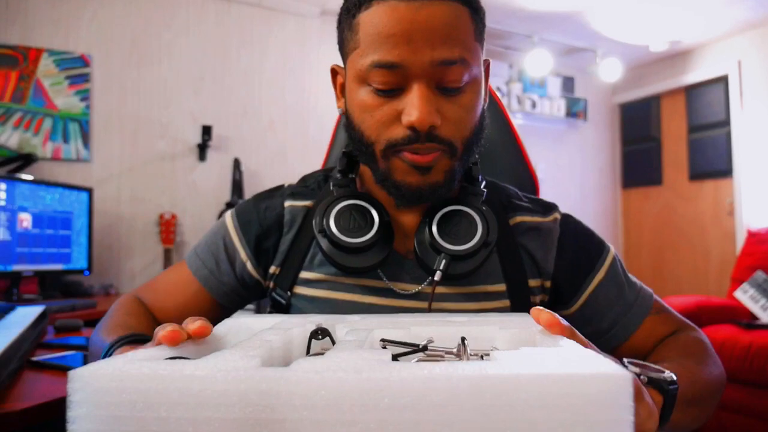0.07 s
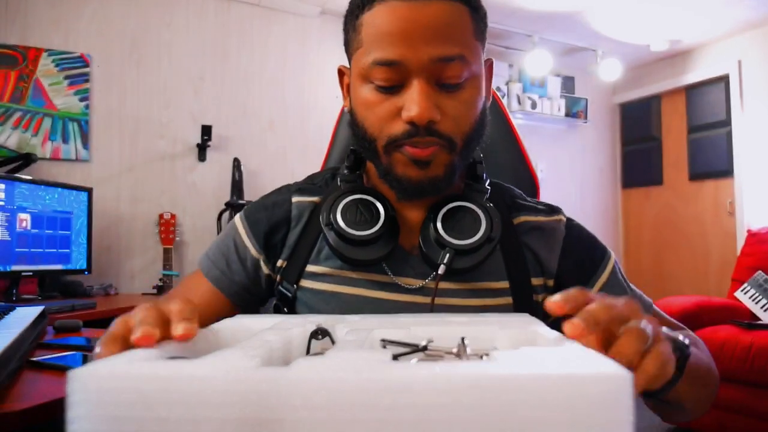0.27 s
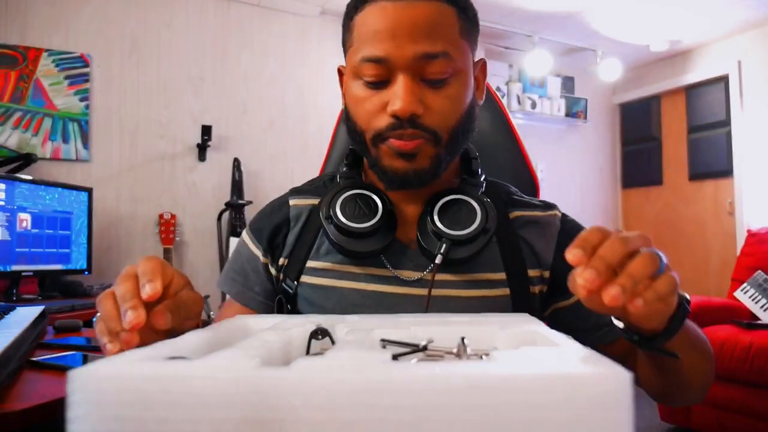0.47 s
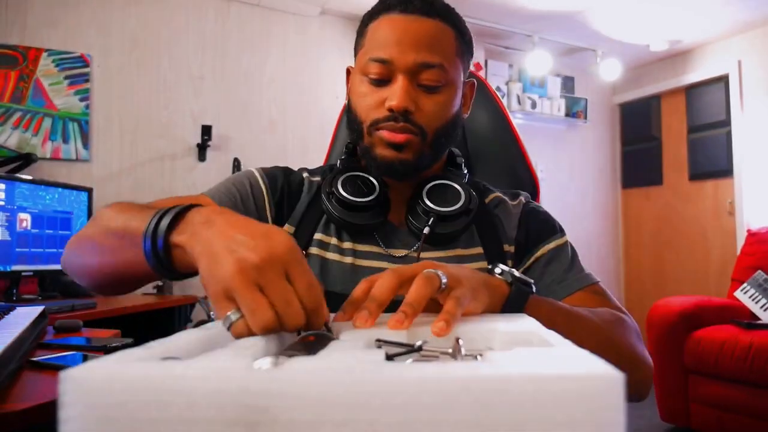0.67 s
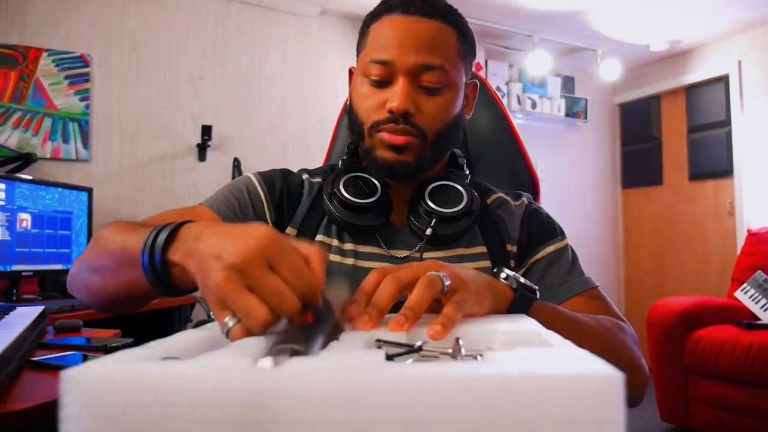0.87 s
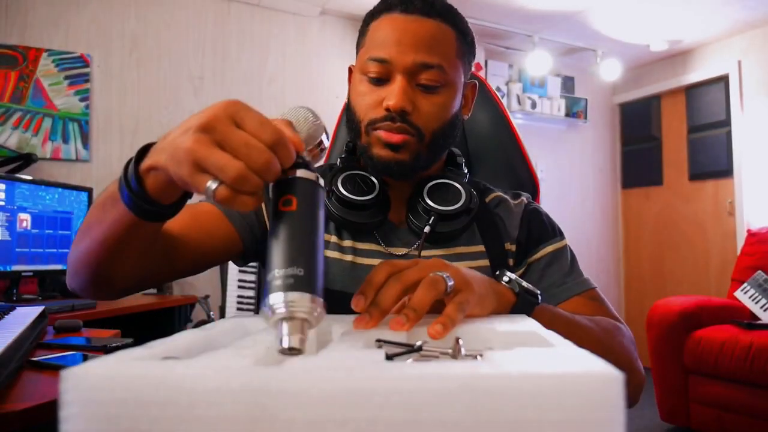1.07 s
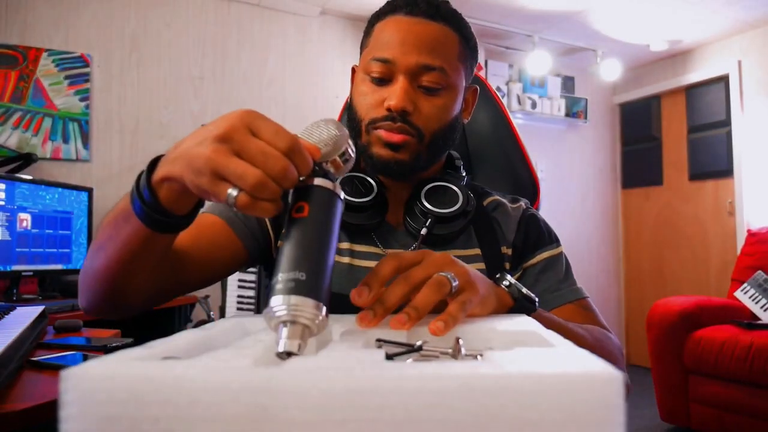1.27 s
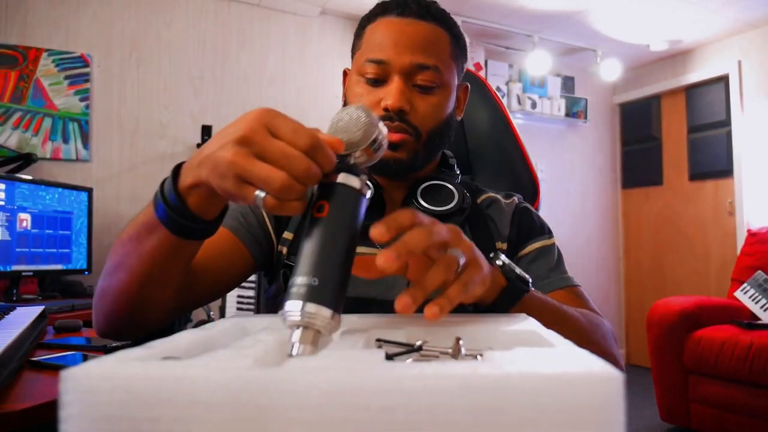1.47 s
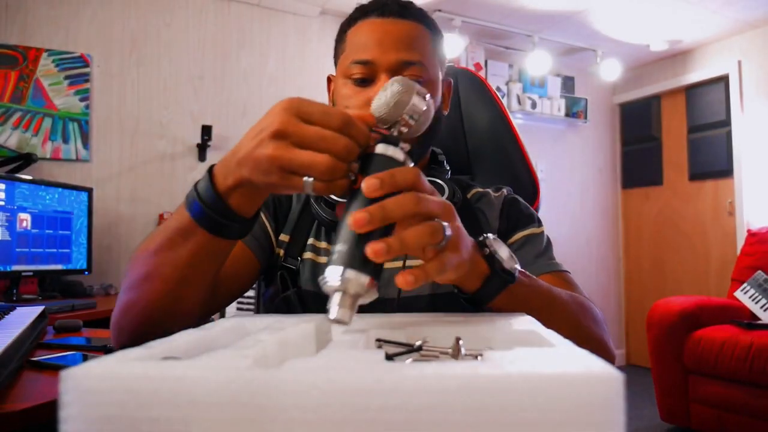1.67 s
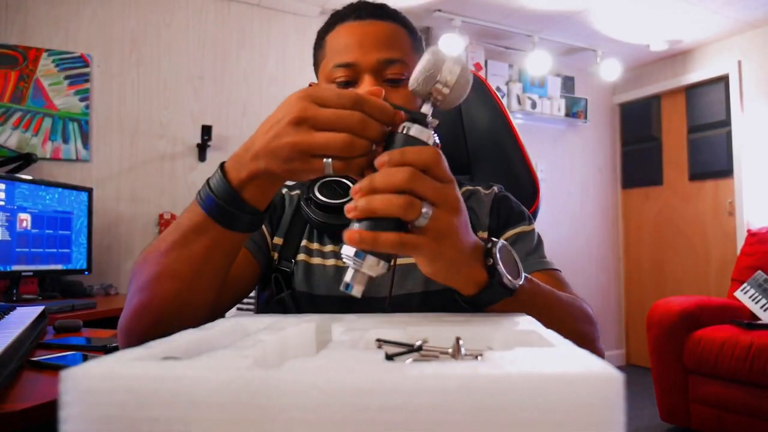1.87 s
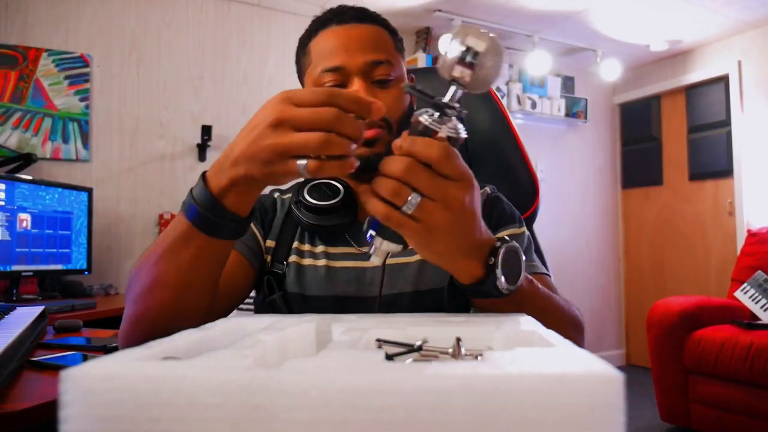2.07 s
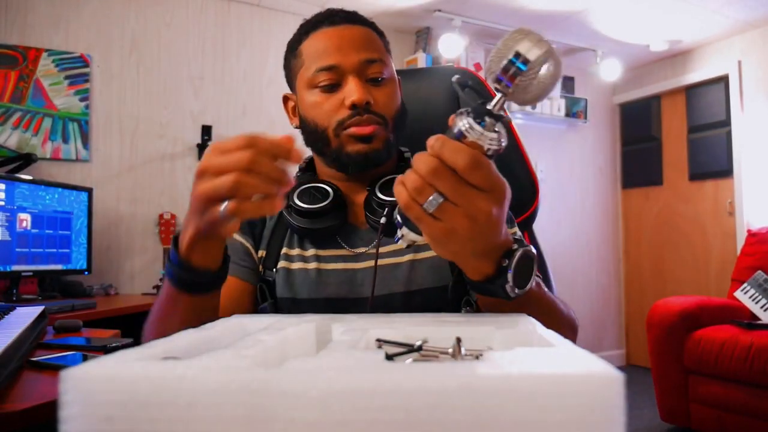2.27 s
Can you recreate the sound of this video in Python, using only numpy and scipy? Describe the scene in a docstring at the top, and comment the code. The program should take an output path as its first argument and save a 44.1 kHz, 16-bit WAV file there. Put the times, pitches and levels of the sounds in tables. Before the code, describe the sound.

Packing foam rasps as a metal object is pulled out. A bump with small clinks comes first, then a swelling rub ending in a squeak, then faint handling ticks. Heard close up in a small room.

```python
"""A desk in a small furnished room, one microphone close by, the image almost mono.
A hand-sized metal object is pulled out of a foam packing insert. Foam cells catch and let go in a
rasp, the hollow rises in pitch as it empties, and the object squeaks free. Loose metal parts clink,
the desk wobbles after a bump, and the object creaks and ticks as it changes hands."""
import sys
import numpy as np
from scipy import signal
from scipy.fft import rfft, irfft
from scipy.io import wavfile

SR = 44100
rng = np.random.default_rng(int(sys.argv[2]) if len(sys.argv) > 2 else 0)


def int16_out(signal):
    """Quantize to a 16-bit WAV file."""
    q = np.round(np.clip(np.atleast_2d(signal).T, -1, 1) * 32767)
    wavfile.write(sys.argv[1], SR, q.astype(np.int16))


N = 101562

# Background of the room: (frequency [Hz], relative density [dB])
ROOM_SPECTRUM = [(30, -8), (90, -15.5), (280, -20), (450, -29.5), (800, -26), (1300, -34.5), (2600, -38.5),
                 (8000, -40), (15500, -42.5)]
# Slow modes of the bumped desk: (frequency [Hz], level [dB], t60 [s])
DESK_MODES = [(18.3, -17, 1), (22.8, -29.5, 0.61)]
# Handling shakes the desk: (time [s], wobble level [dB], rumble level [dB])
DESK_SHAKE = [(0.05, -27, -20), (0.09, -21, -52), (0.2, -28, -52.5), (0.68, -54, -66), (0.93, -47, -39),
              (0.96, -34.5, -65), (1.02, -35.5, -63.5), (2.3, -73, -62)]
# Soft knocks: (time [s], strength [dB], frequency [Hz])
SOFT_KNOCKS = [(.027, -7, 458), (.034, -10.5, 127), (0.0354, -9.5, 232), (.909, -8.5, 530),
               (1.155, -19, 416), (1.16, -23, 710), (1.528, -32, 552), (1.977, -35.5, 320),
               (1.985, -31.5, 520), (2.084, -28.5, 1920), (2.12, -33.5, 890)]
# Modes of the gripped body: (frequency [Hz], relative level [dB], t60 [s])
GRIP_MODES = [(324, -2, 0.0136), (485, 5, 0.017), (708, 2, 0.02), (1047, -2, 0.02), (1590, -13.5, 0.022),
              (2250, -11, 0.023)]
# A ring ticks on the object: (time [s], strength [dB])
RING_TICKS = [(1.917, -23.5), (1.931, -40)]
# Modes of the object's shell: (frequency [Hz], relative level [dB], t60 [s])
SHELL_MODES = [(1160, -5.5, 0.012), (1960, -1.5, 0.019), (2190, -2.5, 0.011), (2910, 2, 0.008),
               (3310, 2, 0.0093), (5060, 2.5, 0.0053), (5490, 1.5, .018), (6900, -11, 0.0087)]
# Foam and finger snaps: (time [s], strength [dB])
FOAM_SNAPS = [(0.4806, -51), (1.4026, -38), (1.4204, -28.5), (1.4318, -38)]
# Loose metal parts meet: (time [s], strength [dB])
PART_HITS = [(0.0556, -35.5), (0.0713, -30), (.0745, -28), (0.1106, -37)]
# Modes of the loose parts: (frequency [Hz], relative level [dB], t60 [s])
PART_MODES = [(2218, 5.5, 0.036), (2490, -10, 0.16), (3030, -6, 0.039), (4590, -5, 0.034),
              (9620, -4.5, 0.04), (13060, -11, 0.11)]
# Squeaks, a palm slide and foam groans:
# (start [s], length [s], frequency [Hz], nominal width [Hz], level [dB])
FRICTION_BANDS = [(.966, 0.021, 7300, 500, -26.5), (.978, 0.034, 8280, 270, -26.5),
                  (1.002, 0.022, 7330, 360, -32), (.942, 0.045, 4300, 1100, -33),
                  (1.22, .045, 2080, 120, -50), (1.81, 0.063, 8100, 2300, -50.5),
                  (1.25, 0.035, 390, 50, -49), (1.395, 0.047, 560, 50, -48.5)]
# Resonance of the emptying hollow: (time [s], frequency [Hz])
HOLLOW_PITCH = [(.74, 562.8), (.82, 509.6), (.92, 569.6), (.96, 720.3), (.985, 880.6), (1.0, 1075),
                (1.03, 894)]
# Colour of the rasp: (frequency [Hz], relative density [dB])
RASP_SPECTRUM = [(150, -10), (300, -8), (560, -5), (900, -11.5), (1500, -11.5), (2800, -15), (4000, -17),
                 (6000, -20), (8200, -17), (10500, -26), (13200, -22), (15500, -24.5)]
# Rubbing on foam and skin, a list per stroke: (time [s], low [dB], middle [dB], high [dB])
RUB_STROKES = [
    [(0.0, -22.5, -34.5, -29), (0.032, -25, -28, -34), (0.05, -30, -38.5, -41.5), (0.082, -41.5, -40, -43),
     (0.132, -39.5, -48.5, -49.5), (0.34, -47.5, -53, -51.5), (0.385, -72, -77, -67)],
    [(0.74, -47.5, -54.5, -54), (0.794, -44.5, -56.5, -55), (0.826, -32.5, -45, -51.5),
     (0.872, -27.5, -32.5, -40), (0.916, -19.5, -23.5, -28), (0.934, -24, -29, -30.5),
     (0.982, -18, -27, -33.5), (1.014, -23.5, -31, -34.5), (1.036, -34.5, -38, -38.5),
     (1.068, -46, -49, -53), (1.145, -52.5, -50.5, -55.5), (1.158, -36.5, -46.5, -46),
     (1.206, -51, -47.5, -48), (1.24, -48, -43.5, -46.5), (1.274, -47, -47.5, -46), (1.29, -65, -58, -58.5),
     (1.338, -57, -59.5, -63), (1.426, -49, -44, -46.5), (1.5, -62, -69.5, -64.5)],
    [(1.655, -73, -65, -64), (1.678, -46, -51.5, -50.5), (1.76, -69, -68.5, -55), (1.862, -92, -68, -53),
     (1.982, -47.5, -50, -51.5), (2.07, -87, -72, -68.5), (2.19, -68, -63.5, -62), (2.234, -67.5, -81, -85),
     (2.3, -72, -86, -94)],
]


def amp(db):
    return 10 ** (np.asarray(db) / 20)


def unit_rms(x):
    return x / np.sqrt(np.mean(x ** 2) + 1e-20)


def curves(rows, outside=-120.):
    """Each column as straight lines between its times."""
    times, *columns = np.transpose(rows)
    return np.array([np.interp(np.arange(N) / SR, times, c, outside, outside) for c in columns])


def drift(corner_hz):
    """Slow random wander of spread 1."""
    step, settle = 40, 2000
    pole = np.exp(-2 * np.pi * corner_hz * step / SR)
    noise = rng.standard_normal(N // step + settle + 2)
    slow = signal.lfilter([1], [1, -2 * pole, pole ** 2], noise)[settle:]
    return np.interp(np.arange(N) / step, np.arange(len(slow)), unit_rms(slow))


def passband(x, hz, kind):
    return signal.sosfilt(signal.butter(2, hz, kind, fs=SR, output="sos"), x)


def coloured(x, spectrum, low_hz, high_hz):
    """Colour from a table between soft band edges, at rms 1."""
    hz = np.maximum(np.fft.rfftfreq(N, 1 / SR), 1)
    table_hz, db = np.transpose(spectrum)
    colour = amp(np.interp(np.log(hz), np.log(table_hz), db))
    skirts = 1 / np.sqrt((1 + (low_hz / hz) ** 6) * (1 + (hz / high_hz) ** 6))
    return unit_rms(irfft(rfft(x) * colour * skirts, N))


def resonate(force, hz, t60):
    """One mode: a unit click starts a decaying sine of height 1."""
    pole, angle = amp(-60 / (t60 * SR)), 2 * np.pi * hz / SR
    return signal.lfilter([0, np.sin(angle)], [1, -2 * pole * np.cos(angle), pole ** 2], force + 1e-18)


def clicks_at(times, gains):
    clicks = np.zeros(N)
    clicks[(np.asarray(times) * SR).astype(int)] = gains
    return clicks


def strike(events, modes, vary_db):
    """Every contact rings every mode with a strength of its own."""
    times, db = np.transpose(events)
    vary = vary_db * rng.standard_normal((len(times), len(modes)))
    return sum(resonate(clicks_at(times, (-1) ** k * amp(db + mode_db + vary[:, k])), hz, t60)
               for k, (hz, mode_db, t60) in enumerate(modes))


def grains(per_s, spread_db=2.5):
    """Random clicks of uneven size."""
    size = amp(spread_db * np.minimum(rng.exponential(1, N), 4)) * rng.choice([-1, 1], N)
    return size * (rng.random(N) < per_s / SR)


def room_tone():
    """A faint steady hush, strongest in the bass."""
    return amp(-57) * coloured(rng.standard_normal(N), ROOM_SPECTRUM, low_hz=31, high_hz=39000)


def room_tail(x, t60=.3):
    """Diffuse reflections, dull at the top and weak this close to the source."""
    t = np.arange(int(.5 * SR)) / SR
    dull_noise = signal.lfilter([.5], [1, -.5], rng.standard_normal(len(t)))
    tail = dull_noise * amp(-60 * t / t60) * (t > .006)
    return amp(-20) * signal.fftconvolve(x, tail / np.sqrt(np.sum(tail ** 2)))[:N]


def desk_wobble(bump_s=.0552):
    """The desk swings freely after the bump; handling keeps it swaying and rumbling."""
    free = sum(resonate(clicks_at([bump_s], amp(db)), hz, t60) for hz, db, t60 in DESK_MODES)
    sway_level, rumble_level = amp(curves(DESK_SHAKE))
    fade_in = np.clip((np.arange(N) / SR - .4) / .15, 0, 1)
    sway = unit_rms(resonate(rng.standard_normal(N), DESK_MODES[0][0], t60=.26))
    rumble = unit_rms(resonate(rng.standard_normal(N), hz=88, t60=.044))
    return free + fade_in * sway_level * sway + rumble_level * rumble


def knocks(gap_s=.0032, ring_cycles=12.8, upper_ratio=1.503):
    """Dull knocks: two soft touches in quick succession ring two modes."""
    sound = np.zeros(N)
    for time, db, hz in SOFT_KNOCKS:
        touches = clicks_at([time, time + gap_s], amp([db - 5.5, db - 12]))
        for mode_hz, gain in (hz, 1), (hz * upper_ratio, amp(-9)):
            sound += gain * resonate(touches, mode_hz, ring_cycles / mode_hz)
    return passband(sound, 1040, "low")


def grip_creak(start_s=1.669, slips=6, slips_per_s=245):
    """The grip slips in a short, slightly uneven run that rings the body."""
    times = start_s + (np.arange(slips) + .062 * rng.standard_normal(slips)) / slips_per_s
    body = strike([(time, -30.5) for time in times], GRIP_MODES, vary_db=3.5)
    return passband(passband(body, 180, "high"), 3500, "low")


def ring_ticks():
    """A ring on the hand taps the shell, whose modes die quickly."""
    shell = strike(RING_TICKS, SHELL_MODES, vary_db=1)
    return passband(passband(shell, 1000, "high"), 8900, "low")


def snaps(t60=.011):
    """Foam, fingers and meeting metal parts each give a bright burst with a short ring."""
    times, db = np.transpose(FOAM_SNAPS + PART_HITS)
    burst = rng.standard_normal(600) * amp(-60 * np.arange(600) / SR / t60)
    clicks = clicks_at(times, amp(db))
    bright = passband(signal.fftconvolve(clicks, burst)[:N], 1300, "high")
    return bright + resonate(clicks, hz=1970, t60=.0076)


def clinks():
    """Loose metal parts strike each other and ring."""
    return strike(PART_HITS, PART_MODES, vary_db=2)


def squeaks():
    """Friction sings in narrow bands of noise: quick rise, hold, quick fall."""
    t = np.arange(N) / SR
    sound = np.zeros(N)
    for start, length, hz, width, db in FRICTION_BANDS:
        envelope = np.interp(t - start, [0, .15 * length, .75 * length, length], [0, 1, 1, 0])
        band = unit_rms(resonate(rng.standard_normal(N), hz, t60=3 / width))
        sound += amp(db) * envelope * band
    return sound


def foam_hollow(hz, width_hz=220, upper_ratio=1.45):
    """Uneven slips ring the hollow; a second resonance joins as the pitch rises."""
    pole = np.exp(-np.pi * width_hz / SR)
    slips = [grains(per_s=3000) for _ in range(4)]
    smoothed = signal.lfilter([1], [1, -2 * pole, pole ** 2], slips)
    swing = smoothed[::2] + 1j * smoothed[1::2]
    swing /= np.sqrt(np.abs(swing) + 1e-9)  # evened halfway to a steady squeak
    phase = 2 * np.pi * np.cumsum(hz) / SR
    lower = swing[0] * np.exp(1j * phase)
    upper = swing[1] * np.exp(1j * phase * upper_ratio)
    upper_gain = amp(-.92) * np.clip((hz - 680) / 190, 0, 1)
    return unit_rms(np.real(lower + upper_gain * upper))


def foam_rasp(patchy_db=1.69, bands_hz=((170, 1500), (1500, 6000), (6000, 30000))):
    """Foam cells catch and let go in dense grains; the emptying hollow sounds in the low band."""
    strokes = sum(amp(curves(stroke)) for stroke in RUB_STROKES)
    level = strokes * amp([patchy_db * drift(corner_hz=44) for _ in bands_hz])
    low, middle, high = [coloured(grains(per_s=9000), RASP_SPECTRUM, *band) for band in bands_hz]
    hollow_hz, = curves(HOLLOW_PITCH, outside=0)
    low = np.where(hollow_hz > 0, amp(-5) * low + amp(-4) * foam_hollow(hollow_hz), low)
    return level[0] * low + level[1] * middle + level[2] * high


def scene():
    """Close on the desk; left and right differ only faintly, most at the very top."""
    contacts = ring_ticks() + clinks() + snaps() + knocks() + grip_creak()
    mid = room_tone() + foam_rasp() + squeaks() + contacts + room_tail(contacts) + desk_wobble()
    diffuse = signal.fftconvolve(mid, rng.standard_normal(600) / np.sqrt(600), "same")
    side = amp(-34) * (diffuse + amp(9) * passband(diffuse, 12000, "high"))
    return np.array([mid + side, mid - side])


def record(dry, stop_hz=15900):
    """A steep low-pass takes off the highest treble."""
    return signal.sosfilt(signal.cheby2(14, 70, stop_hz, fs=SR, output="sos"), dry)


dry = scene()
out = record(dry)
int16_out(out)
```